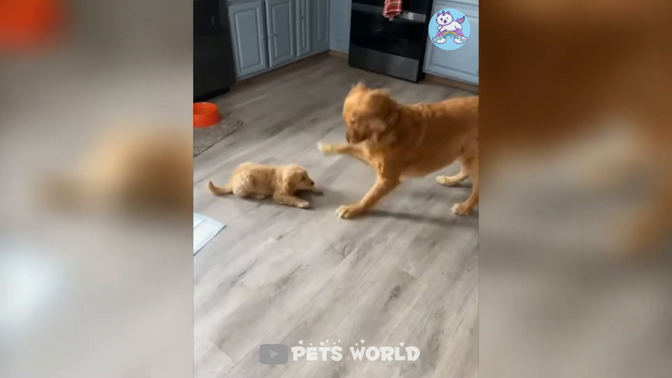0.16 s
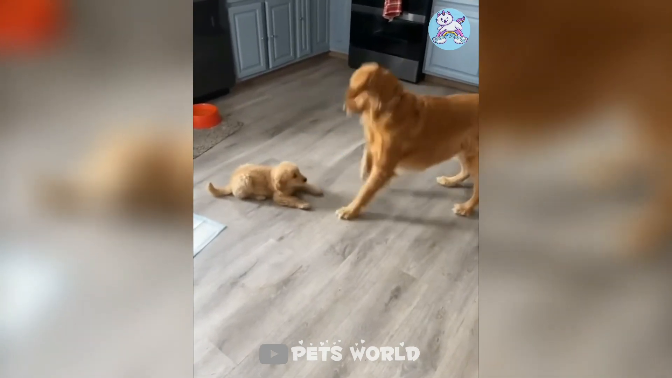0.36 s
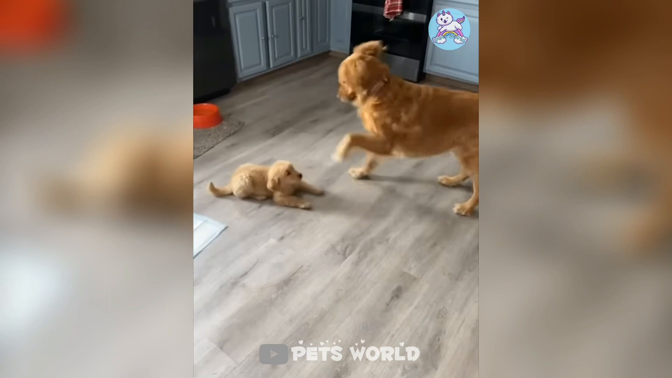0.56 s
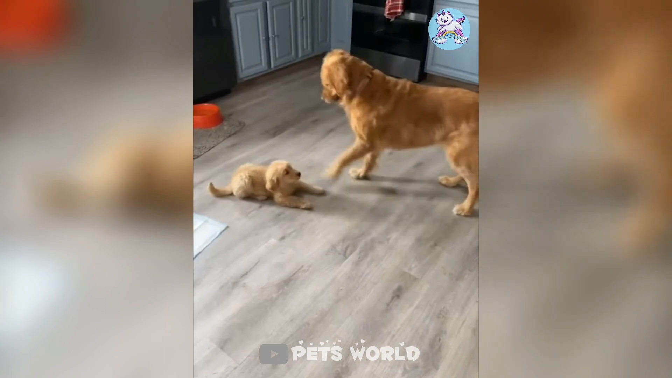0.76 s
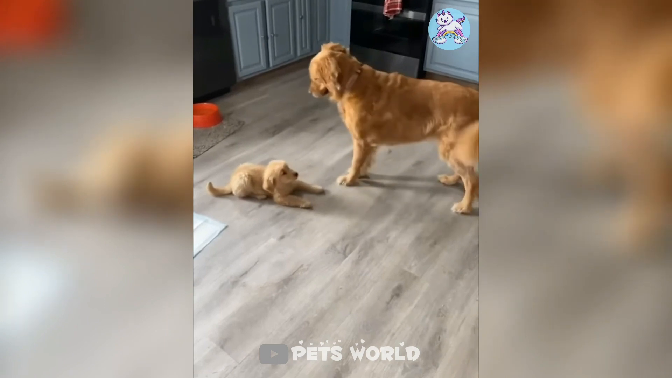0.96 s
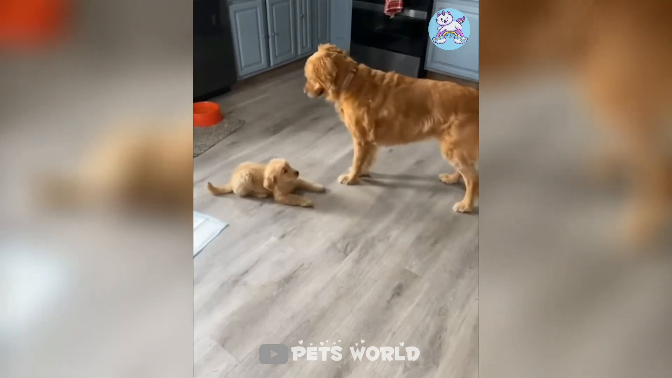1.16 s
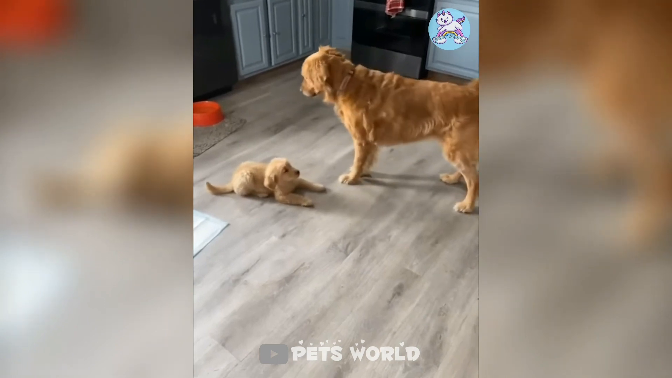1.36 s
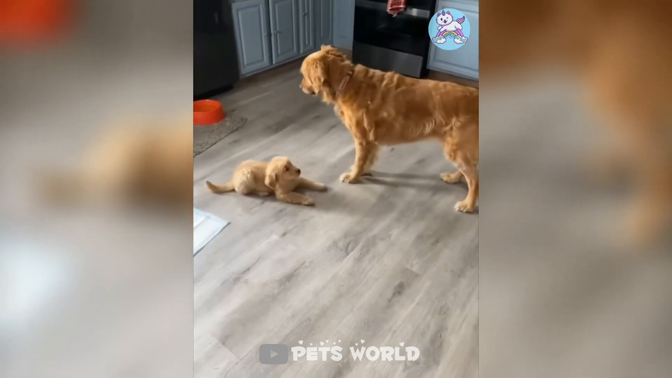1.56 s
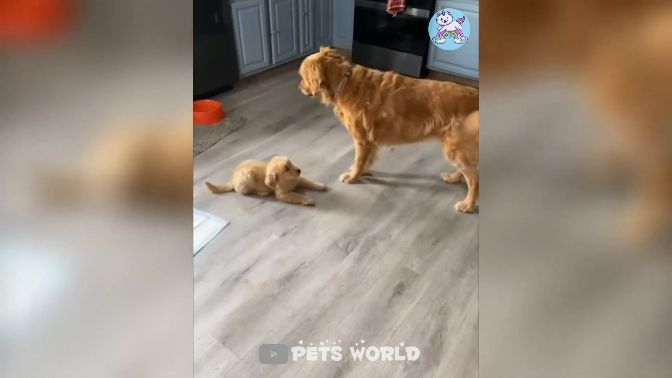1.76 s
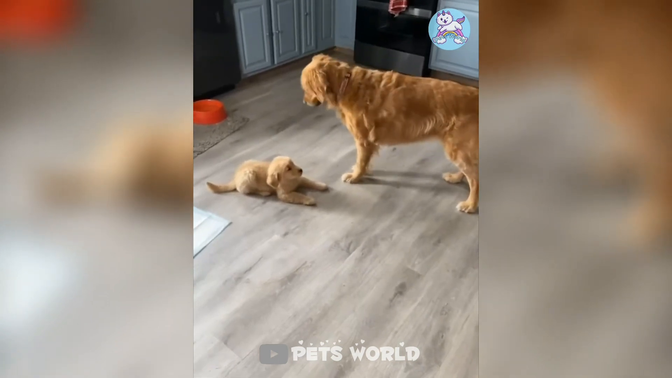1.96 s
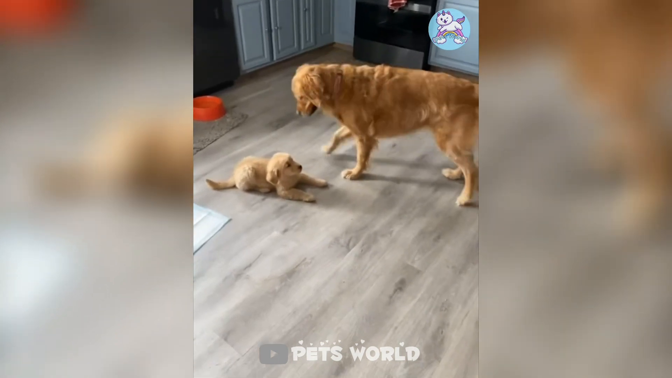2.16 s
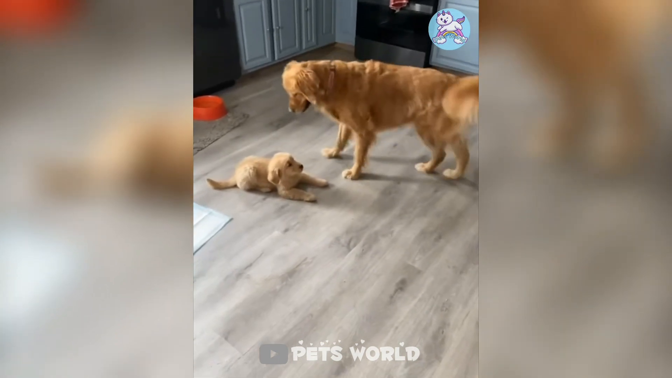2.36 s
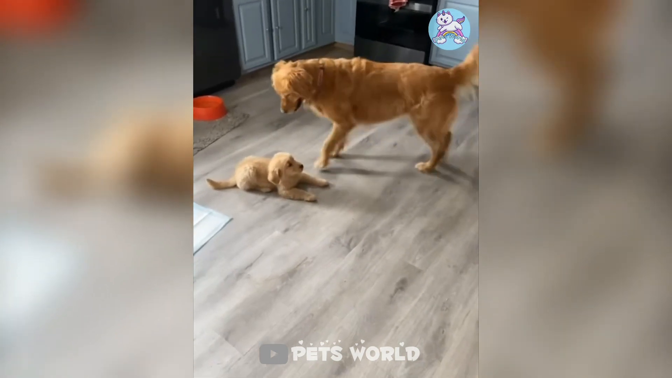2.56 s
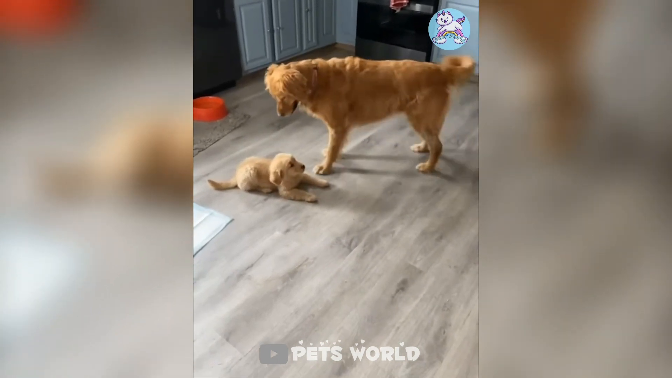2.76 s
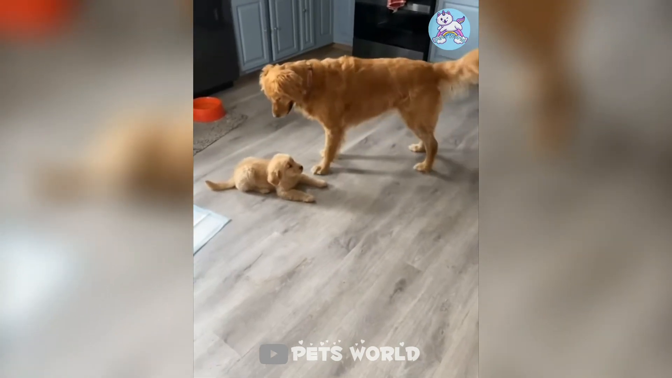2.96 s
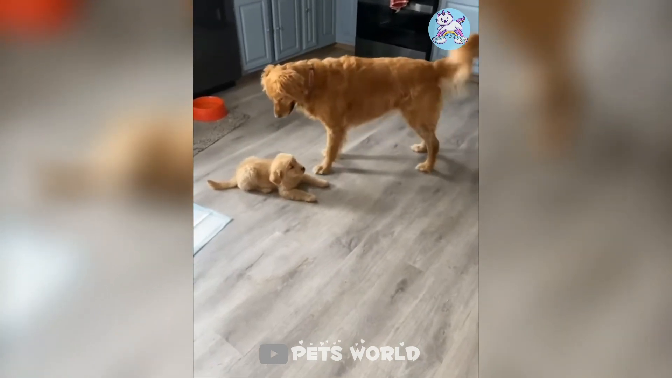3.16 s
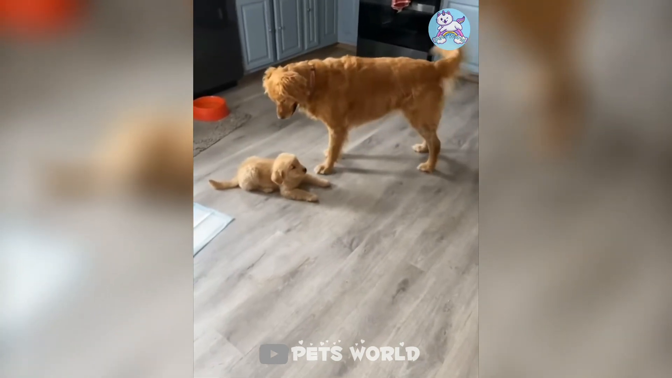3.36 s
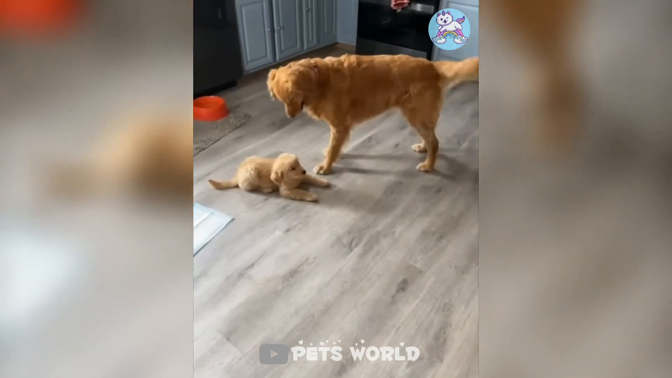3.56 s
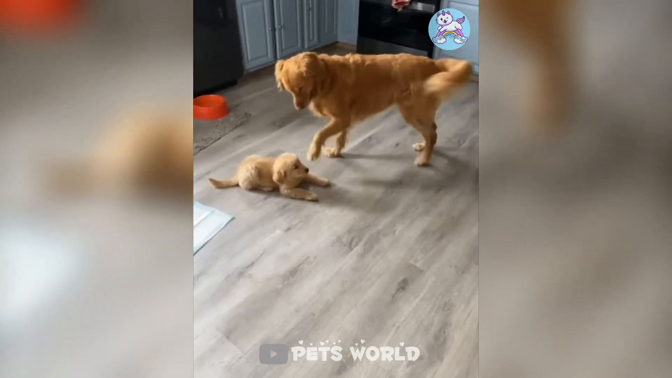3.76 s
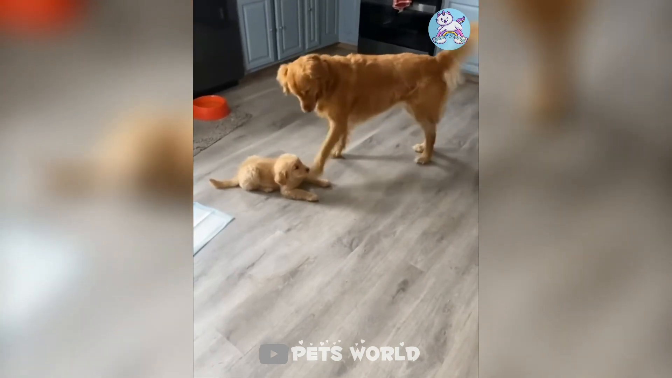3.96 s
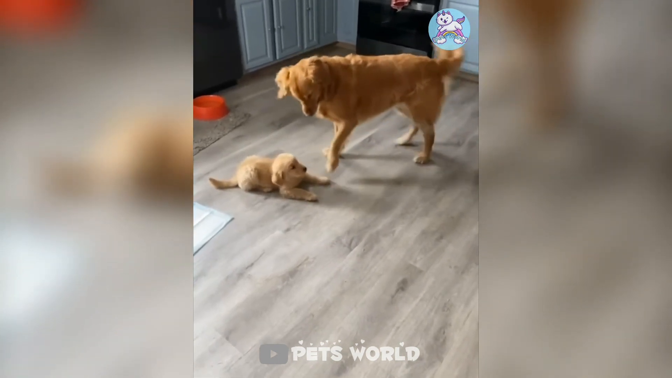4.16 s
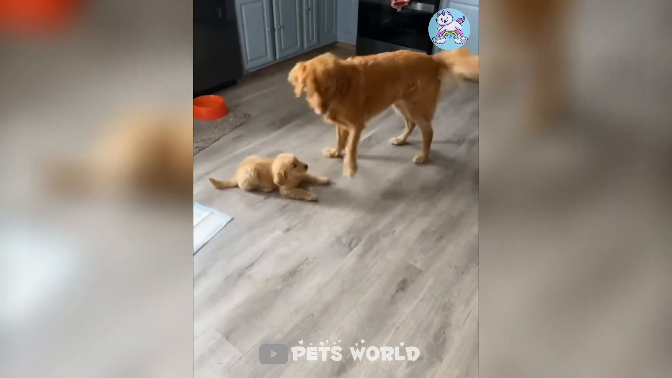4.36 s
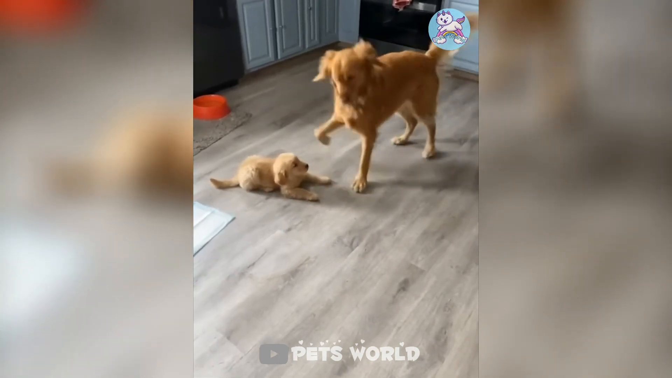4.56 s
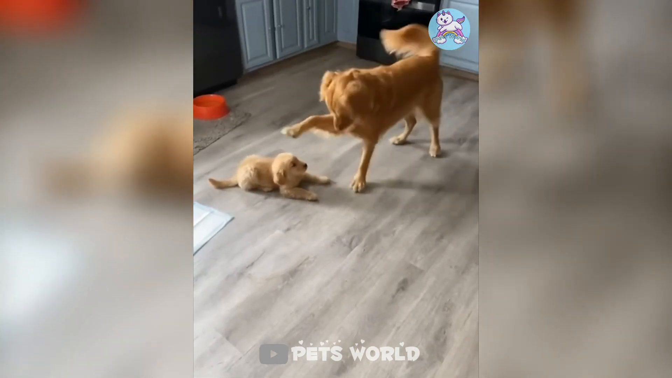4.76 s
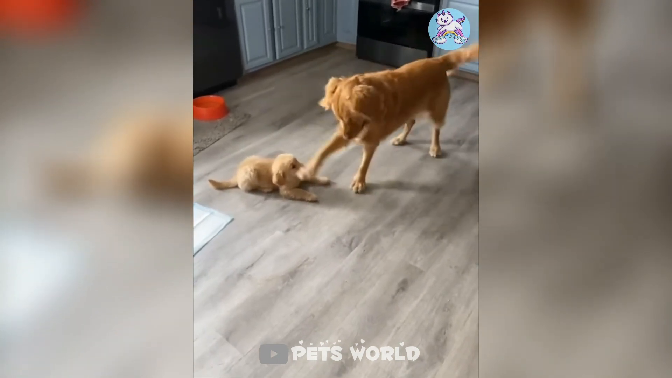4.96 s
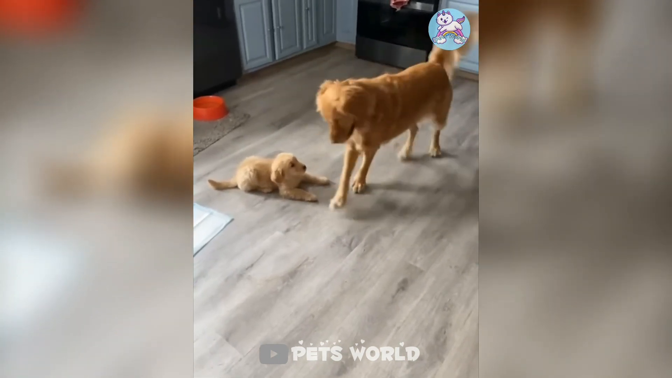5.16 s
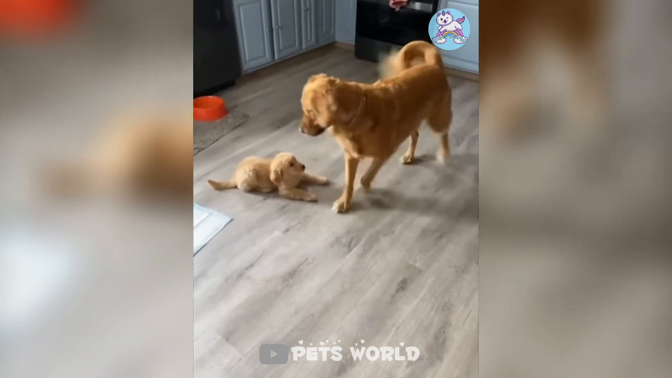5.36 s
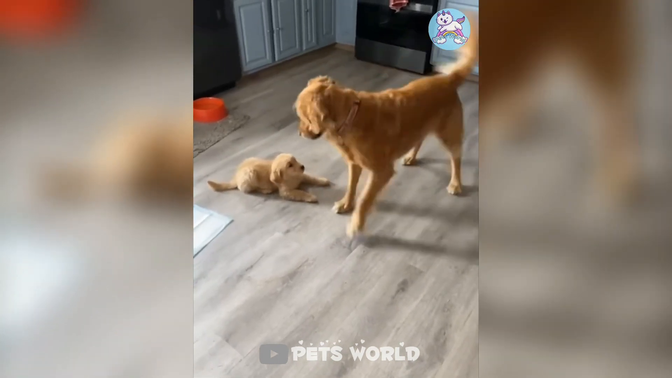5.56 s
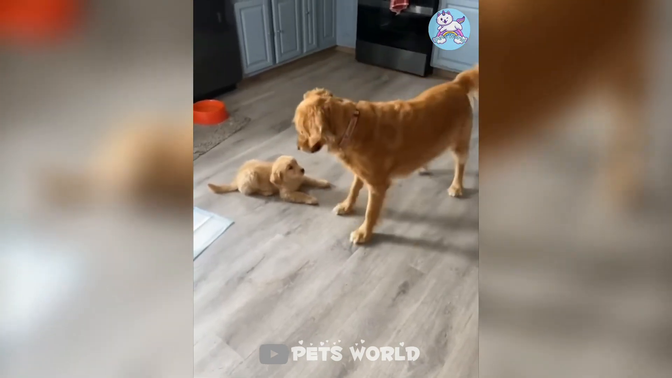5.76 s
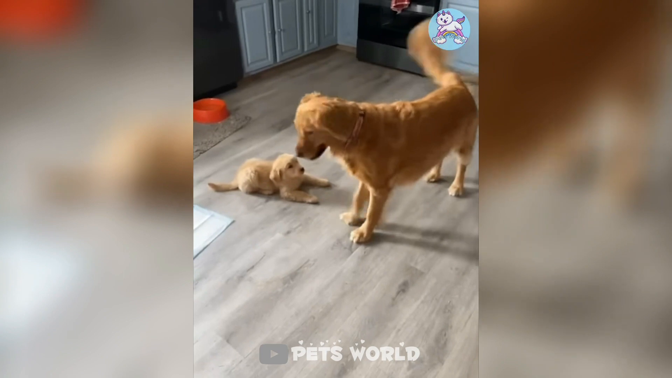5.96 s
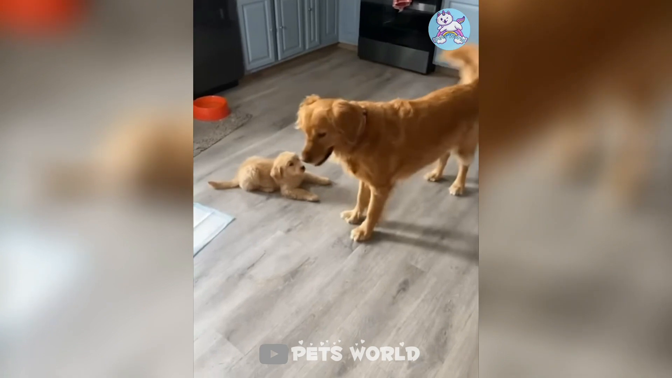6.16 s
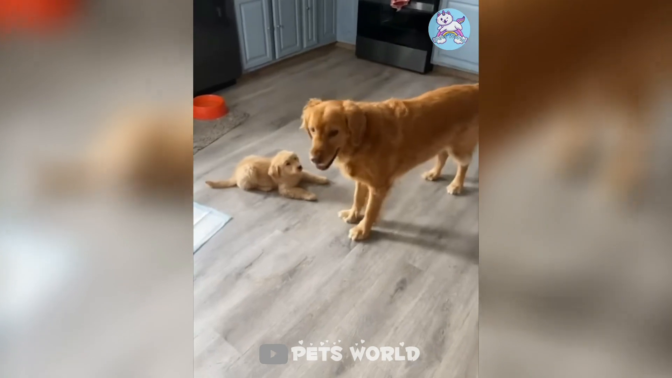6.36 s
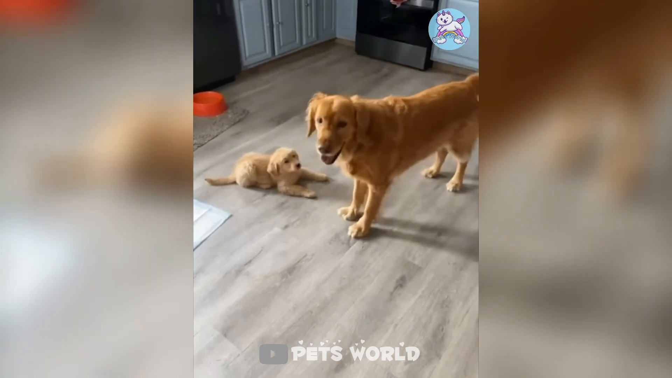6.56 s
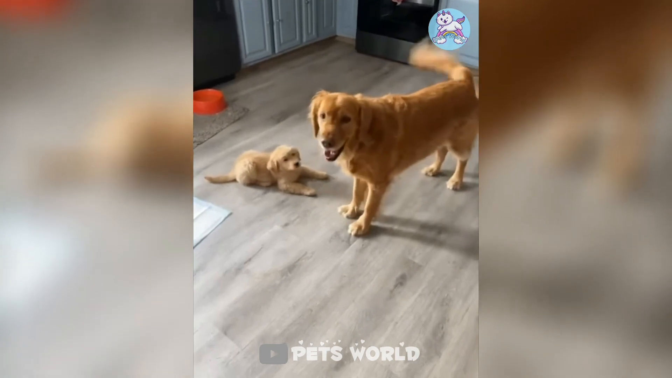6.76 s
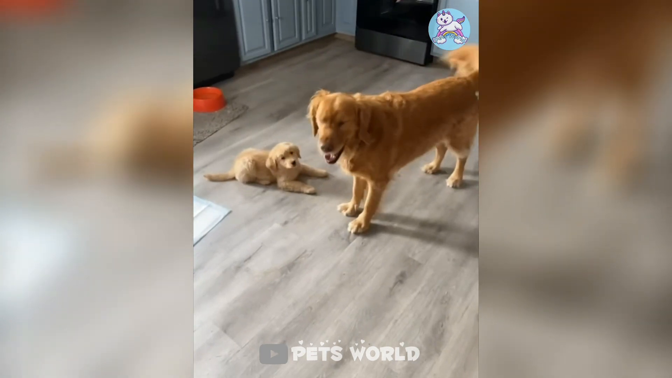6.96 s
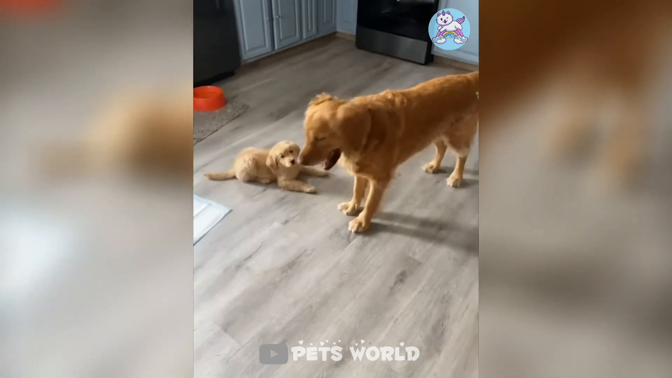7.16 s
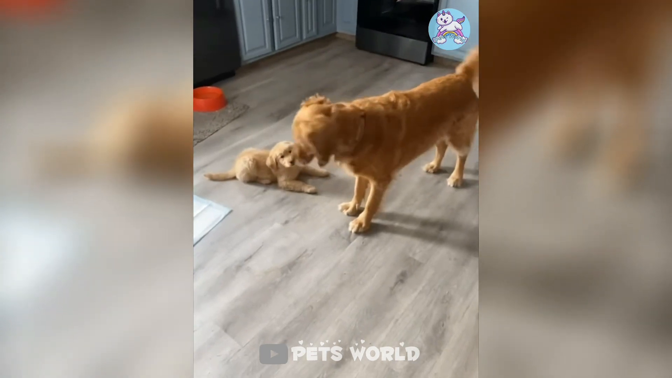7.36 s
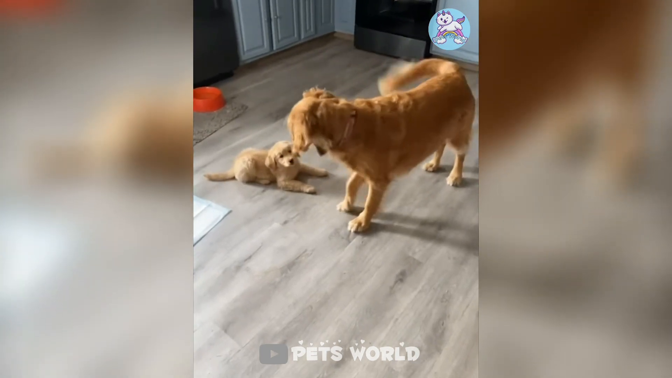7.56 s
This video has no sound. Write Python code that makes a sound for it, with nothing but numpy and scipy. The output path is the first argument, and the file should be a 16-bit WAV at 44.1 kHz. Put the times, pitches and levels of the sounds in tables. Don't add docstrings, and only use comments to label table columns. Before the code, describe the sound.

Sharp dog-claw clacks and soft thuds burst across a hard kitchen floor, collar tags clinking, then nose huffs and faint panting over refrigerator hum.

```python
import sys
import numpy as np
from scipy import signal
from scipy.io import wavfile
from scipy.ndimage import uniform_filter1d

SR = 44100
rng = np.random.default_rng(int(sys.argv[2]) if len(sys.argv) > 2 else 0)


def ratio_of_db(decibels):
    return 10 ** (np.asarray(decibels, float) / 20)


def log_audio(samples):
    frames = np.atleast_2d(samples).T
    limited = np.clip(frames, -1, 1)
    pcm = np.round(limited * 32767).astype(np.int16)
    wavfile.write(sys.argv[1], SR, pcm)


N = 336042


def evened(x):
    return x / np.sqrt(np.mean(x ** 2) + 1e-20)


def read(points, hz):
    f, value = np.transpose(points)
    return np.interp(np.log(hz + 1), np.log(f + 1), value)


def add(mix, start_s, sound):
    part = mix[round(max(start_s, 0) * SR):][:len(sound)]
    part += sound[:len(part)]


def colour(x, gain_db):
    hz = abs(np.fft.fftfreq(len(x), 1 / SR))
    log_gain = np.log(ratio_of_db(np.maximum(gain_db(hz), -100)))
    response = np.exp(np.conj(signal.hilbert(log_gain)))
    return np.fft.ifft(np.fft.fft(x) * response).real


def resonate(x, hz, width_hz):
    turn = np.exp(2j * np.pi * np.cumsum(hz * np.ones(len(x))) / SR)
    r = np.exp(-np.pi * width_hz / SR)
    return 2 * (turn * signal.lfilter([1 - r], [1, -r], x / turn)).real


def twice(x, hz, width_hz):
    return resonate(resonate(x, hz, width_hz), hz, width_hz)


def octaves(hz):
    return np.log2(np.maximum(hz, 200) / 4000)


def bump(hz, centre_hz, half_width_hz):
    return 1 / (1 + ((hz - centre_hz) / half_width_hz) ** 2)


def room_tail():
    # (frequency [Hz], t60 [s])
    decay = [(100, 0.33), (260, 0.27), (700, 0.32), (1840, 0.323), (4850, 0.32), (12800, 0.24)]
    gap_s, build_s, echo_db = .0015, .0012, 11
    size = SR // 2
    taps = rng.choice([-1., 1.], size) * (rng.random(size) < .15)
    taps[rng.integers(150, 1500, 8)] = ratio_of_db(echo_db) * rng.uniform(-1.2, 1, 8)
    hz, t, z = signal.stft(taps, SR, nperseg=128)
    z = z * ratio_of_db(-60 * t / read(decay, hz)[:, None])
    tail = signal.istft(z, SR, nperseg=128)[1][:size]
    since_gap_s = np.maximum(np.arange(size) / SR - gap_s, 0)
    tail = tail * (1 - np.exp(-since_gap_s / build_s))
    return tail / np.linalg.norm(tail)


def in_room(direct, source, wet_db):
    wet = ratio_of_db(wet_db) * signal.fftconvolve(source, room_tail())
    wet[:len(direct)] += direct
    return wet


def room_tone():
    # (frequency [Hz], level [dB per Hz])
    air = [(12, -60), (20, -27.5), (60, -3.5), (91, -5.5), (128, -5.5), (156, -10), (237, -6), (382, -12),
           (479, -13), (1390, -23.5), (1740, -24.5), (2060, -28), (4530, -29.5), (14700, -40),
           (16500, -51.5)]
    # (frequency [Hz], width [Hz], level [dB])
    hum = [(122.3, 11, -65), (233, 9, -65), (821.7, 17, -75.5), (1082, 14, -87.5), (1190, 20.9, -76.5),
           (4426, 4.3, -83.5), (4457, 5, -83.5), (4597, 5, -89)]
    frames, hz = N // 512 + 5, np.fft.rfftfreq(2048, 1 / SR)
    a, b, patches = rng.standard_normal((frames, 1025, 3)).T
    patches = evened(uniform_filter1d(uniform_filter1d(patches, 20, 0), 8, 1))
    patch_db = 2.9 * patches / (1 + hz[:, None] / 1500)
    z = (a + 1j * b) * ratio_of_db(read(air, hz)[:, None] + patch_db)
    tone = ratio_of_db(-56.5) * evened(signal.istft(z, nperseg=2048, noverlap=1536)[1][:N])
    noise = rng.standard_normal(N)
    return tone + sum(ratio_of_db(db) * evened(twice(noise, f, w)) for f, w, db in hum)


def rumble():
    # (time [s], level [dB], time to die by 20 dB [s])
    lurches = [(.3, -46.5, 0.71), (.45, -46.5, 0.31), (.69, -42, 0.2463), (.91, -55.5, 0.39),
               (1.77, -57, 0.51), (2.03, -56.5, 0.49), (2.32, -54, 0.59), (2.8, -51, 0.29),
               (3.75, -57.5, 1.17), (4.11, -41, 0.31), (4.4, -47, 0.18), (4.6, -45, 0.04),
               (5.17, -39, 0.04), (5.36, -45, 0.33), (5.779, -45, 0.19), (6.09, -49.5, 0.1758),
               (6.44, -46, 0.4), (6.62, -44.5, 0.11), (6.8, -53, 0.35), (6.97, -53.5, 0.05),
               (7.19, -53.5, 1)]
    still_db, rise_share = -65.5, .7
    noise, t = rng.standard_normal(N), np.arange(N) / SR
    x = twice(noise, 56, 31) + .6 * twice(noise, 44, 18)
    power = ratio_of_db(still_db) ** 2
    for s, db, die_s in lurches:
        distance_s = np.maximum(t - s, (s - t) / rise_share)
        power = power + ratio_of_db(db - 20 * distance_s / die_s) ** 2
    return evened(x) * np.sqrt(power) * ratio_of_db(-0.5)


def whine():
    # (time [s], level [dB])
    load = [
        (0, -83),
        (2, -79),
        (3.9, -83),
        (4.9, -77),
        (6.2, -84),
        (6.8, -76),
        (7.2, -75),
        (7.62, -82),
    ]
    hz, waver_db, waver_s = 3465, 1.5, .05
    span, t = round(waver_s * SR), np.arange(N) / SR
    waver = evened(uniform_filter1d(uniform_filter1d(rng.standard_normal(N), span), span))
    level = ratio_of_db(np.interp(t, *np.transpose(load)) + waver_db * waver)
    return level * np.sqrt(2) * np.sin(2 * np.pi * hz * t)


def clink(db, small_db, ring_db, t60_s):
    # (frequency [Hz], level [dB])
    large_tag = [(10055, -7.5), (10160, 2), (10000, -5), (13620, -7.5), (13680, -14), (14220, -19.5),
                 (9180, -15.5)]
    # (frequency [Hz], level [dB])
    small_tag = [(6000, -6.5), (6023, -6)]
    # (frequency [Hz], level [dB])
    split_ring = [(4270, -5), (4370, -4), (4490, -5), (2500, -10), (2090, -9), (7870, -4.5)]
    t = np.arange(SR // 4) / SR
    modes = large_tag + [(hz, d + small_db) for hz, d in small_tag]
    modes = modes + [(hz, d + ring_db) for hz, d in split_ring]
    x = np.zeros(len(t))
    for hz, mode_db in modes:
        noise = rng.standard_normal(len(t))
        flutter = 1 + .7 * evened(uniform_filter1d(uniform_filter1d(noise, 200), 200))
        level = ratio_of_db(mode_db - 37 * t * (hz / 10000) ** 4)
        x += level * flutter * np.sin(2 * np.pi * (hz * t + rng.random()))
    attack, damped = 1 - np.exp(-t / 0.00082), np.clip((.18 - t) / .03, 0, 1)
    x *= ratio_of_db(db - 60 * t / t60_s) * attack * damped
    return in_room(x, x, wet_db=-6.5)


def scuff(s, db, fall_s, tilt_db):
    # (frequency [Hz], level [dB per Hz])
    pad_fur = [(290, -42), (500, -18), (1500, -6), (1710, -2), (6470, -5), (7060, -8.5), (8540, -4),
               (14500, -27), (15800, -25), (16500, -63.5)]
    rise_s = .013 + .08 * fall_s
    lead_s = min(s, 3 * rise_s)
    t = np.arange(2 ** 14) / SR - lead_s
    stroke = np.where(t < 0, np.exp(-(t / rise_s) ** 2), np.exp(-t / fall_s))
    slip_size = ratio_of_db(2.2 * np.minimum(rng.exponential(1, len(t)), 4.5))
    slips = rng.standard_normal(len(t)) * slip_size
    rub = colour(slips, lambda hz: read(pad_fur, hz) + tilt_db * octaves(hz))
    x = ratio_of_db(db) * stroke * evened(rub)
    return s - lead_s, in_room(x, x, wet_db=-0.5)


def claw(db, tilt_db, wet_db, ring_hz):
    # (frequency [Hz], level [dB per Hz])
    nail = [(180, -34), (300, -18), (504, -15), (1770, -4.5), (2240, -1.5), (3650, -3.5), (4170, -1),
            (7020, -1), (8870, 2), (11400, -5.5), (14900, -5), (15700, -32), (16500, -31.5)]
    span = SR * 2.6 / 1000
    at, size = rng.random((2, 6))
    ticks = .08 * rng.standard_normal(2048) * np.exp(-np.arange(2048) / span)
    at[0], size[0] = 0, -.3
    np.add.at(ticks, (span * at).astype(int), (-1) ** np.arange(6) * ratio_of_db(-12 * size))
    board = list(zip(np.geomspace(300, 16000, 30), 2.2 * rng.standard_normal(30)))

    def strike_db(hz):
        ring_db = 5.2 * bump(hz, ring_hz, 0.12 * ring_hz)
        return read(nail, hz) + read(board, hz) + tilt_db * octaves(hz) + ring_db

    def room_db(hz):
        return 3.5 * bump(hz, 800, 250) - 1.3 * np.maximum(octaves(hz), 0) ** 2

    tick = colour(signal.unit_impulse(2048), strike_db)
    x = signal.fftconvolve(ticks, tick)
    x *= ratio_of_db(db + 4.5) / abs(x).max()
    dulled = colour(tick, room_db) * np.linalg.norm(x) / np.linalg.norm(tick)
    return in_room(x, dulled, wet_db)


def thud(db, hz, t60_s):
    t = np.arange(SR // 2) / SR
    boom = twice(rng.standard_normal(len(t)), hz, 70)
    boom = boom + 0.249 * twice(rng.standard_normal(len(t)), 210, 200)
    board = 1.1 * np.exp(-t / .025) * np.sin(2 * np.pi * hz * t)
    attack = 1 - np.exp(-t / 0.001)
    return ratio_of_db(db - 1.5 - 60 * t / t60_s) * attack * (evened(boom) + board)


def breath(length_s, flow_db, mouth_db, posture):
    # (frequency [Hz], width [Hz], level [dB])
    nose_modes = [(1317, 110, -2.5), (1880, 190, 6.5), (2612, 330, -1.5), (4218, 300, -11),
                  (2920, 2100, -12.5), (7050, 4500, -20)]
    # (frequency [Hz], width [Hz], level [dB])
    mouth_modes = [(450, 500, -1), (1100, 700, -2), (1950, 600, -2), (2650, 500, -5), (4700, 1500, -19)]
    skew, sharp = 0.78, 1.54
    t = np.arange(0, length_s, 1 / SR)
    nose_air, mouth_air = rng.standard_normal((2, len(t)))
    nose, mouth = np.zeros((2, len(t)))
    for k, (hz, width_hz, db) in enumerate(nose_modes):
        nose += (-1) ** k * ratio_of_db(db) * twice(nose_air, hz * posture, 0.986 * width_hz)
    for k, (hz, width_hz, db) in enumerate(mouth_modes):
        mouth += (-1) ** k * ratio_of_db(db) * twice(mouth_air, hz, width_hz)
    gusts = ratio_of_db(evened(uniform_filter1d(rng.standard_normal(len(t)), 500)))
    x = evened(nose * gusts) + ratio_of_db(mouth_db) * evened(mouth)
    arch = abs(np.sin(np.pi * (t / length_s) ** skew)) ** sharp
    return ratio_of_db(flow_db - 5.5) * x * arch


def scene():
    # (time [s], level [dB], small tag [dB], ring [dB], t60 [s])
    clinks = [
        (.001, -41.5, -16.5, -33, 0.189),
        (0.032, -53, 0, -27, 0.2),
        (.794, -50, -4, 7.5, 0.19),
        (0.809, -37.5, -16, -3.5, 0.204),
        (2.76, -64, -16, -17, 0.145),
        (4.643, -39.5, -18.5, -23.5, 0.21),
        (4.684, -40, -14, -12, 0.137),
        (4.70, -50.5, 13.5, -20.5, 0.238),
    ]
    # (time at full speed [s], level [dB], fall [s], tilt [dB per octave])
    scuffs = [(.002, -46.5, 0.015, 6.5), (0.019, -50.5, 0.0047, -3), (0.522, -53, 0.15, -1.7),
              (2.05, -58, 0.049, -6.5), (2.264, -43.5, 0.016, -1.72), (2.451, -45, 0.011, -0.1),
              (2.53, -50.5, 0.011, -5.5), (2.614, -39.5, 0.0061, -0.69), (2.76, -39.5, 0.0077, -0.5),
              (2.80, -53.5, 0.032, -6), (3.71, -51, 0.09, -4), (3.844, -41, .02, -0.5),
              (3.88, -45, 0.022, -2), (4.06, -63, 0.11, -3.5), (4.175, -39.5, 0.0098, 1),
              (4.276, -51.5, 0.076, -4.5), (4.382, -57, 0.18, -5.5), (4.855, -59, 0.02, 2.5),
              (5.151, -49, 0.06, -3.5), (5.225, -53, 0.01085, -7.5), (5.446, -39.5, 0.019, 0.5),
              (5.6, -57.5, 0.019, -5.5), (5.805, -50.5, 0.063, -4.5), (5.923, -38.5, 0.01, -1.5),
              (7.605, -63.5, .02, 1), (5.08, -56, .09, -1.5)]
    # (time [s], peak [dB], tilt [dB per octave], room [dB])
    tips = [(0.1243, -1.5, -1.61, 1.5), (0.3378, -3, -0.76, 4.5), (0.6231, -4.5, -0.58, 2),
            (0.8943, -16, -1.36, 0.5), (2.3148, -21.5, -2.5, -1), (2.5706, -31.5, 0.5, 4),
            (4.2593, -33, -3, 0.5), (4.5213, -36, 2.5, 2), (4.6833, -16.5, 0.9, -4),
            (5.3224, -23.5, -0.37, 4), (5.6977, -24, -1.5, -1)]
    # (time [s], peak [dB], tilt [dB per octave], room [dB])
    slants = [
        (2.6924, -20.5, -1.5, 4.5),
        (4.5503, -5.5, -0.89, 0.5),
        (4.6951, -30.5, -1.5, 2.5),
        (5.3148, -16.5, -2, -2),
    ]
    # (time [s], peak [dB], tilt [dB per octave], room [dB], board ring [Hz])
    flats = [(0.7934, -22, 0.88, 3.5, 2067), (2.031, -53, 5, 10, 1880), (2.8985, -38.5, -4.3, -7.5, 2040),
             (3.6913, -35, 7, 5, 1890), (5.2762, -18.5, 0.5, 5, 2920), (5.4126, -28.5, -3.5, 2, 2280),
             (5.4235, -27, 1.5, 2, 3520), (5.5777, -50, 8.5, 16, 1580), (5.677, -18.5, -3, 2.5, 2680),
             (5.7916, -32.5, -2.5, 1.5, 2700), (5.909, -29.5, -4, 2.5, 1920), (6.0276, -24, -2, 7.5, 1680)]
    # (time [s], peak [dB], floor ring [Hz], t60 [s])
    thuds = [(0.126, -24.5, 143, 0.3), (0.345, -31, 165.5, 0.26), (0.628, -24.5, 164, 0.35),
             (0.912, -43, 64.2, 0.25), (2.309, -41, 113, 0.25), (2.707, -49, 61.9, 0.25),
             (4.101, -43.5, 161, 0.35), (4.555, -30.5, 167, 0.34), (5.278, -36.5, 144, 0.28),
             (5.32, -44.5, 113, 0.46), (5.689, -35.5, 62.8, 0.23), (.142, -27, 64, 0.27),
             (.66, -42.5, 50.43, .4), (4.103, -40.5, 186, .2), (2.70, -51, 175, 0.25),
             (5.69, -41, 196, 0.23), (6.03, -50, 190, 0.21), (6.29, -50, 131, 0.28)]
    # (start [s], length [s], airflow [dB], mouth re nose [dB], nose resonance scale [ratio])
    huffs = [(1.541, 0.188, -59, -3, 0.56), (1.799, .16, -67, -3, 0.51), (2.001, 0.156, -61, 6.5, 1.03),
             (2.1, 0.163, -60, 6.5, 1.16), (3.493, 0.255, -46, -6.5, 1.007),
             (3.6, 0.254, -40, -10.5, 1.015), (3.81, 0.085, -45, -6, .81), (4.252, .16, -51.5, -8.5, 1.05),
             (4.4, 0.1445, -49.5, -.4, 1.11), (5.01, .27, -49.5, -1.5, 1.1), (5.06, .12, -50, -8, 1.29),
             (5.561, 0.1095, -55, 2, 0.86)]
    # (start [s], length [s], airflow [dB])
    pants = [
        (6.131, 0.217, -64.5),
        (6.39, 0.203, -63),
        (6.59, 0.149, -53.5),
        (6.78, 0.119, -68),
        (6.948, .28, -64.5),
        (7.231, 0.1746, -58),
        (7.422, 0.198, -66),
    ]
    tip_hz, slant_hz = 8700, 6197
    pant_mouth_db, pant_posture = 8, 1.04

    mix = room_tone() + rumble() + whine()
    for s, *strike in clinks:
        add(mix, s, clink(*strike))
    for slide in scuffs:
        add(mix, *scuff(*slide))
    claws = [(*c, tip_hz) for c in tips] + [(*c, slant_hz) for c in slants] + flats
    for s, *strike in sorted(claws):
        add(mix, s, claw(*strike))
    for s, *blow in thuds:
        add(mix, s, thud(*blow))
    for s, *puff in huffs + [(*p, pant_mouth_db, pant_posture) for p in pants]:
        add(mix, s, breath(*puff))
    return mix[None]


def top_cut(x):
    return signal.sosfilt(signal.butter(12, 16840, fs=SR, output="sos"), x)


def record(dry):
    limit, dropout_s, hiss_db = .88, 1.05, -83
    hiss = ratio_of_db(hiss_db) * evened(twice(rng.standard_normal(N), 13400, 2500))
    gap = 1 - .9 * np.exp(-((np.arange(N) / SR - dropout_s) / .003) ** 2)
    limited = limit * np.tanh((dry + hiss) / limit)
    return top_cut(limited * gap)


dry = scene()
out = record(dry)
log_audio(out)
```